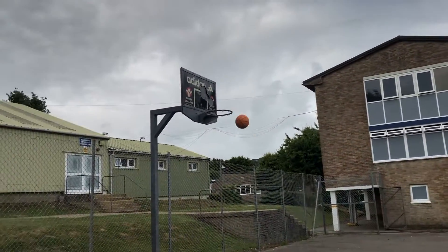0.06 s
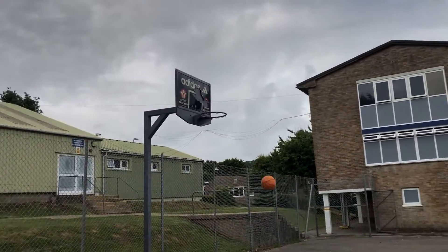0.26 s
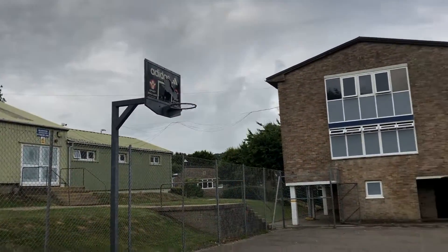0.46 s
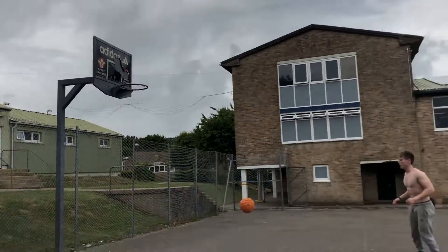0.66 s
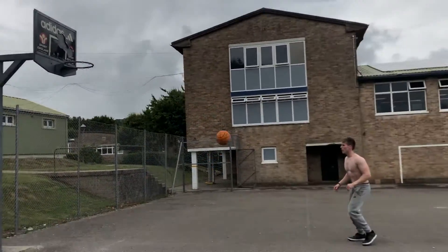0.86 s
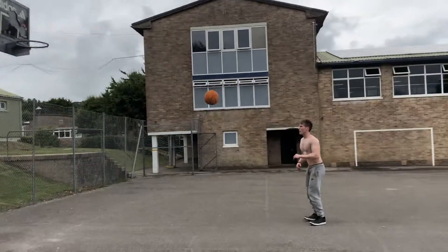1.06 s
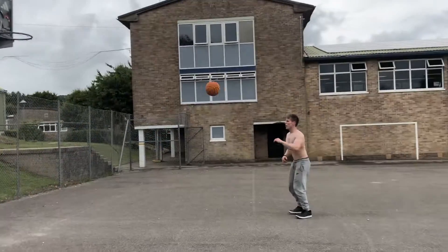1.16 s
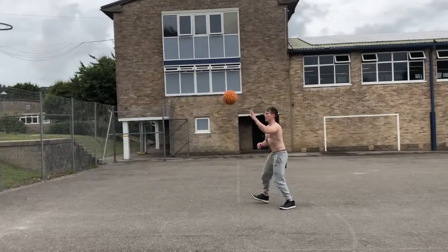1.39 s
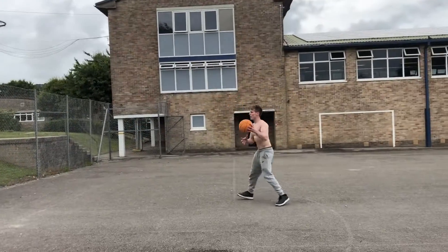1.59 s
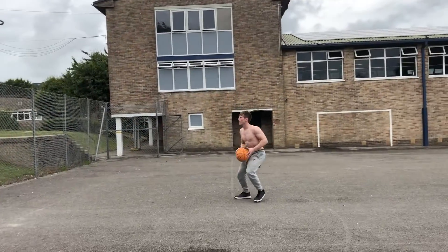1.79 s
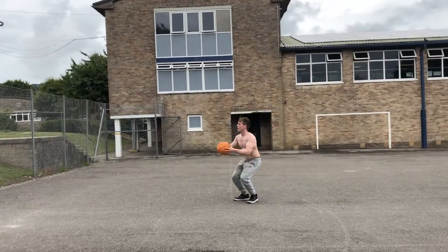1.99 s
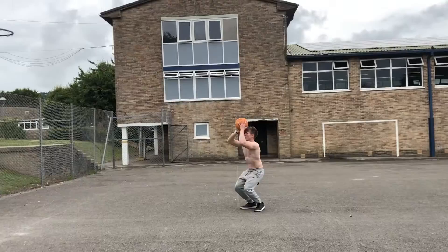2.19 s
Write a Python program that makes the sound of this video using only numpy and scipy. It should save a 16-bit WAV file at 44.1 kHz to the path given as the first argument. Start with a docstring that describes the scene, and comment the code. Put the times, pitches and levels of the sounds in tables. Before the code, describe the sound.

A basketball bounces once on tarmac close by at 0.5 seconds, a sharp, loud bang with a short echo off buildings. From the start, a loose metal hoop rattles faintly, dying away by about 1.2 seconds. From 0.8 seconds, uneven wind rumbles and thumps on the microphone to the end. Shoes scuff quietly around 1.5 seconds, and hands softly catch the ball at 1.7 seconds.

```python
"""Basketball off an outdoor hoop

A yard between buildings, uneven wind rumbling on the microphone. The ball has just left the hoop,
whose loose rim rattles and dies away. It lands on the tarmac close by: the skin cracks, skin and air
ring, and the walls throw the bang back. A player scuffs in over the grit and catches it."""
import sys
import numpy as np
from scipy import signal
from scipy.fft import rfft, irfft
from scipy.io import wavfile
from scipy.ndimage import uniform_filter1d

SR = 44100
rng = np.random.default_rng(int(sys.argv[2]) if len(sys.argv) > 2 else 0)


def store_pcm(level_fs):
    """Save levels as 16-bit WAV."""
    pcm = np.round(np.clip(level_fs, -1, 1) * 32767).astype(np.int16)
    wavfile.write(sys.argv[1], SR, np.atleast_2d(pcm).T)


N = 99048
T = np.arange(N) / SR
BOUNCE_S = 0.5014

# Wind on the microphone. Each row: time in seconds, rumble level in dB, flutter level in dB.
WIND_LEVELS = [(.03, -55, -57), (.09, -58.5, -54.5), (.81, -51.5, -60), (0.844, -38, -55.5),
               (0.941, -38, -46.5), (1.01, -39, -49), (1.138, -39, -37), (1.23, -40.5, -59.5),
               (1.39, -35.5, -42.5), (1.491, -39, -46.5), (1.62, -41.5, -55), (1.861, -50.5, -53.5),
               (2.03, -44, -57.5), (2.169, -45.5, -63.5), (2.223, -33, -42)]
# Low rumble, the flutter above it, and the open-air hush. Each row: frequency in Hz, level in dB.
RUMBLE_SPECTRUM = [(22, -28.5), (36, -6.5), (55, 6), (110, 3.5), (230, -12.5), (400, -62), (4000, -110)]
FLUTTER_SPECTRUM = [(100, -9.5), (180, 0.5), (260, -2.5), (400, -14.5), (900, -40.5), (2000, -73.5),
                    (12000, -76)]
HUSH_SPECTRUM = [(240, -11.5), (400, -1), (801, -9), (2250, -21), (3500, -29), (5870, -24), (7750, -33.5),
                 (15000, -40.5)]
# The hardest buffets. Each row: middle in seconds, level in dB, frequency in Hz.
EDDIES = [(0.917, -31.5, 129), (0.945, -27, 82.5), (1.132, -29, 232), (1.177, -29, 143), (1.26, -28, 117),
          (1.393, -29.5, 112), (1.484, -25.5, 130), (2.218, -29.5, 121)]

# Echoes off the buildings. Each row: delay in seconds, level in dB, scatter level in dB.
WALL_ECHOES = [(.091, -14, -22), (0.146, -28.5, -27.5), (.16, -32, -24)]
# What the walls return, and the yard's reverberation. Each row: frequency in Hz, level in dB.
WALL_SPECTRUM = [(560, 0.5), (780, -0.5), (980, 4), (1350, -10), (1560, 0), (3000, -2.5), (15000, -20.5)]
REVERB_SPECTRUM = [(60, -23), (600, 2.5), (1400, -3), (3500, -1), (6000, -5.5), (14000, -1.5)]

# Ticks of metal and grit, and two soft plops. Each row: start in seconds, level in dB.
TICK_HITS = [(0.232, -46.5), (1.056, -47.5), (1.428, -51.5)]
PLOP_HITS = [(2.113, -45.5), (2.154, -43)]
# Dull knocks. Each row: start in seconds, level in dB, centre in Hz.
KNOCK_HITS = [(0.026, -46.5, 1070), (0.191, -42, 392), (1.701, -46, 568)]
# The colour of a tick. Each row: frequency in Hz, level in dB.
TICK_SPECTRUM = [(1100, 10.5), (2200, -14), (6500, -2), (9000, -24), (15000, -34)]

# Soles sliding over sand. Each row: middle in seconds, level in dB, width in seconds.
SOLE_SLIDES = [(1.509, -67.5, 0.012), (1.712, -64, 0.012), (1.842, -65, .005)]
# Shoes scuffing the tarmac. Each row: start in seconds, level in dB, rise in seconds.
SHOE_SCUFFS = [(1.448, -56, 0.0013), (1.588, -54.5, 0.0019), (1.697, -51.5, 0.0046)]
# Hands meeting the ball. Each row: start in seconds, level in dB, 60 dB decay in seconds.
HAND_SLAPS = [(1.662, -49, 0.015), (1.672, -42, 0.022), (1.703, -44, 0.083), (1.720, -48, 0.1),
              (1.738, -50.5, 0.066), (1.752, -44, 0.04)]
# The colours of sand, shoes and palms. Each row: frequency in Hz, level in dB.
SAND_SPECTRUM = [(5700, 6), (9000, -10.5), (15000, -17.5)]
SHOE_SPECTRUM = [(200, 20.5), (600, 13.5), (2200, 1), (4000, -14), (6000, -4.5), (9000, -23), (15000, -26)]
PALM_SPECTRUM = [(150, 7.5), (550, -11), (950, 0), (1450, 6), (2100, -8.5), (3000, -20.5), (6000, -23.5),
                 (15000, -55)]

# Knocks of the loose rim. Each row: start in seconds, level in dB, rise in seconds.
RIM_KNOCKS = [(.0, -48.5, 0.0013), (0.054, -56, 0.005), (0.113, -51, 0.0035), (0.185, -44.5, 0.0093),
              (0.267, -45.5, 0.022), (0.345, -46.5, 0.0042), (0.417, -47.5, 0.0093), (0.481, -49.5, 0.008),
              (.557, -46.5, 0.0064), (0.638, -50.5, 0.0032), (0.711, -51.5, 0.0094), (0.771, -50, 0.0068),
              (.835, -51, 0.0054), (0.908, -51.5, 0.007), (0.986, -53, 0.0058), (1.124, -53.5, .003),
              (1.182, -53.5, 0.0018)]
# The colour of the rim's chatter. Each row: frequency in Hz, level in dB.
RIM_SPECTRUM = [(150, -14.5), (330, 15), (520, -2.5), (660, 9), (820, -1), (1080, 6.5), (1300, -3),
                (1750, 0), (2150, -11), (2650, -5.5), (4300, -8), (6000, -3.5), (8000, -16.5), (15000, -44)]
# The steel hoop's close modes, each a frequency in Hz.
HOOP_MODES = [1063, 1072, 1112]

# The skin flattening onto grit. Each row: delay in seconds, level in dB, rise and 60 dB decay in seconds.
GRIT_BURSTS = [(0, -20.5, 0.00045, 0.015), (.008, -37.5, 0.00408, 0.062)]
# The first click on the tarmac, and the crushed grit. Each row: frequency in Hz, level in dB.
CRACK_SPECTRUM = [(150, -39.5), (500, -19), (780, 3.7), (1100, 3), (1650, 5), (2100, -17.5), (2600, -8),
                  (3300, -16), (4700, 1.4), (5300, -4.5), (6100, 4), (7000, -13.5), (9500, -17.5),
                  (15000, -49)]
GRIT_SPECTRUM = [(1250, 13), (2300, -4.5), (3500, -5), (4700, -3.5), (6100, 1), (7300, -11), (15000, -30)]
# Modes of the ball's skin and air. Each row: frequency in Hz, level in dB, 60 dB decay in seconds.
BALL_MODES = [(178.4, -27, 0.11), (256.4, -21.5, 0.067), (433, -27, 0.055), (614, -26.5, 0.045),
              (688, -33, 0.067), (903, -24.5, 0.062), (967, -22, 0.053), (1090, -30.5, 0.096),
              (1306, -33, 0.038), (1370, -30.5, 0.096), (1550, -34, 0.043), (1591, -38, 0.089),
              (1656, -32.5, 0.052), (1900, -47.5, 0.021), (2784, -48, 0.0662)]


def amp(db):
    """Decibels to gain."""
    return 10 ** (np.asarray(db) / 20)


def noise(spectrum):
    """Noise of unit rms shaped by (Hz, dB) points, falling away below the first."""
    hz, db = np.array(spectrum, float).T
    f = np.maximum(np.fft.rfftfreq(N, 1 / SR), 1)
    gain = amp(np.interp(np.log(f), np.log(hz), db)) * np.minimum(f / hz[0], 1) ** 2
    x = irfft(gain * np.exp(2j * np.pi * rng.random(len(f))), N)
    return x / x.std()


def click(spectrum, size=2048):
    """Minimum-phase impulse of unit energy shaped by (Hz, dB) points."""
    hz, db = np.array(spectrum, float).T
    f = np.maximum(np.fft.rfftfreq(size, 1 / SR), 1)
    cepstrum = irfft(np.log(amp(np.interp(np.log(f), np.log(hz), db))))
    cepstrum[1:size // 2] *= 2
    cepstrum[size // 2 + 1:] = 0
    x = irfft(np.exp(rfft(cepstrum)))
    return x / np.sqrt(np.sum(x ** 2))


def burst(start, rise, t60):
    """Envelope: a straight rise, then an exponential decay; times in seconds."""
    age = T - start
    attack = np.clip(age / max(rise, 1 / SR), 0, 1)
    return attack * np.exp(-np.log(1000) * np.maximum(age - rise, 0) / t60)


def swell(middle, width):
    """Bell-shaped envelope; times in seconds."""
    return np.exp(-((T - middle) / width) ** 2 / 2)


def glide(hz):
    """A sine that follows a changing frequency."""
    return np.sin(2 * np.pi * np.cumsum(hz) / SR)


def wander(rate_hz):
    """Smooth random drift of unit spread."""
    step = max(int(SR / rate_hz), 1)
    x = uniform_filter1d(np.repeat(rng.standard_normal(N // step + 1), step), step)[:N]
    return x / x.std()


def flicker(depth_db, rate_hz):
    """A gain that wavers at random."""
    return amp(depth_db * wander(rate_hz))


def smear(x, tail):
    """Draw a sound out with a tail of unit energy."""
    return signal.fftconvolve(x, tail / np.sqrt(np.sum(tail ** 2)))[:N]


def wind():
    """Gusts rumble and flutter on the microphone over a faint outdoor hush."""
    times, rumble_db, flutter_db = np.array(WIND_LEVELS).T
    rumble = noise(RUMBLE_SPECTRUM) * amp(np.interp(T, times, rumble_db))
    flutter = noise(FLUTTER_SPECTRUM) * amp(np.interp(T, times, flutter_db))
    gusts = (rumble + flutter) * flicker(depth_db=2, rate_hz=49)
    return gusts + amp(-66) * noise(HUSH_SPECTRUM)


def buffets(width_cycles=0.58):
    """Single eddies thump the microphone for a cycle or two."""
    return sum(amp(db) * swell(t, width_cycles / hz) * np.sin(2 * np.pi * (hz * (T - t) + rng.random()))
               for t, db, hz in EDDIES)


def yard(x):
    """Each building returns a coloured copy and some scatter; a thin reverberation follows."""
    wall = click(WALL_SPECTRUM)
    reflected = signal.fftconvolve(x, wall)[:N] / abs(np.sum(wall))
    out = amp(-20.5) * smear(x, noise(REVERB_SPECTRUM) * burst(0, rise=0.079, t60=1))
    for delay, db, scatter_db in WALL_ECHOES:
        out += amp(db) * np.interp(T - delay, T, reflected, left=0)
        scatter = rng.standard_normal(N) * burst(delay, rise=0.0015, t60=0.13)
        out += amp(scatter_db) * smear(reflected, scatter)
    return out


def ribbed_wall(x, delay_s=0.053, start_hz=2230, end_hz=1490, glide_s=0.037):
    """Ribs further along a wall answer later and wider apart, so the echo is a falling zing."""
    hz = end_hz + (start_hz - end_hz) * np.exp(-np.maximum(T - delay_s, 0) / glide_s)
    zing = glide(hz * (1 + 0.036 * wander(rate_hz=500)))
    return amp(-32) * smear(x, zing * burst(delay_s, rise=0, t60=0.18))


def plops(start_hz=1330, fall_nepers_per_s=150):
    """Two short, soft blips whose pitch drops fast."""
    out = np.zeros(N)
    for t, db in PLOP_HITS:
        hz = start_hz * np.exp(-fall_nepers_per_s * np.maximum(T - t, 0)) * (T > t)
        out += amp(db) * burst(t, rise=0.003, t60=0.035) * glide(hz)
    return out


def ticks_and_knocks():
    """Small bright ticks of metal and grit, and a few dull, soft knocks."""
    out = noise(TICK_SPECTRUM) * sum(amp(db) * burst(t, rise=0.000099, t60=0.018) for t, db in TICK_HITS)
    for t, db, hz in KNOCK_HITS:
        spectrum = [(hz * 0.66, -12), (hz, 0), (hz * 1.3, -15), (hz * 3, -36), (hz * 12, -65)]
        out += amp(db) * burst(t, rise=0.0023, t60=0.072) * noise(spectrum)
    return out


def sand():
    """Sand hisses under sliding soles."""
    slides = sum(amp(db) * swell(t, width) for t, db, width in SOLE_SLIDES)
    return noise(SAND_SPECTRUM) * flicker(depth_db=1.5, rate_hz=730) * slides


def shoes():
    """Shoes scuff the tarmac, rough with many tiny contacts."""
    scuffs = sum(amp(db) * burst(t, rise, t60=0.16) for t, db, rise in SHOE_SCUFFS)
    return noise(SHOE_SPECTRUM) * flicker(depth_db=4.5, rate_hz=830) * scuffs


def catch():
    """Fingers and palms slap the ball in quick succession."""
    slaps = sum(amp(db) * burst(t, rise=0.00033, t60=t60) for t, db, t60 in HAND_SLAPS)
    return noise(PALM_SPECTRUM) * slaps


def rim(treble_hz=7600, treble_start_db=4.5, treble_db_per_s=-8.5):
    """The loose rim chatters in its mount about fourteen times a second and the frame rings on."""
    power = np.zeros(N)
    for t, db, rise in RIM_KNOCKS:
        knock = burst(t, rise, t60=0.091)
        ring = amp(-14) * burst(t, rise, t60=0.53)
        power += amp(db) ** 2 * (knock ** 2 + ring ** 2)
    chatter = np.sqrt(power) * noise(RIM_SPECTRUM) * flicker(depth_db=2.5, rate_hz=700)
    body = signal.sosfiltfilt(signal.butter(4, treble_hz, fs=SR, output="sos"), chatter)
    # The treble dulls as the microphone turns away.
    return body + (chatter - body) * amp(treble_start_db + treble_db_per_s * T)


def hoop():
    """Every knock of the rim sets the steel hoop's close modes ringing."""
    out = np.zeros(N)
    for t, db, rise in RIM_KNOCKS:
        modes = sum(np.sin(2 * np.pi * (hz * T + rng.random())) for hz in HOOP_MODES)
        out += amp(db) * burst(t, rise, t60=0.28) * modes
    return amp(-14.5) * out


def crack(lag_below_hz=3510):
    """First contact: a sharp click whose treble runs ahead through the skin, then crushed grit."""
    snap = np.pad(amp(-0.8) * click(CRACK_SPECTRUM), (int(BOUNCE_S * SR), N))[:N]
    warped = np.tan(np.pi * lag_below_hz / SR)
    allpass = (warped - 1) / (warped + 1)
    for _ in range(8):  # each stage holds the lows back a little more
        snap = signal.lfilter([allpass, 1], [1, allpass], snap)
    crush = sum(amp(db) * burst(BOUNCE_S + delay, rise, t60) for delay, db, rise, t60 in GRIT_BURSTS)
    return snap + noise(GRIT_SPECTRUM) * crush


def bounce(lag_cycles=0.94, rise_cycles=0.58, thump_hz=139.2, sag_nepers_per_s=18.5):
    """Close by, the ball cracks down, its modes enter from high to low, and it squashes with a thump."""
    age = T - BOUNCE_S
    out = crack()
    for hz, db, t60 in BALL_MODES:
        lag = lag_cycles / hz
        envelope = burst(BOUNCE_S + lag, rise_cycles / hz, t60)
        out += amp(db) * envelope * np.sin(2 * np.pi * hz * (age - lag))
    sagging_hz = thump_hz * np.exp(-sag_nepers_per_s * np.maximum(age, 0)) * (age > 0)
    thump = amp(-18.5) * swell(BOUNCE_S + 0.0197, width=0.0072) * glide(sagging_hz)
    return out + thump


def scene():
    """Ball, hoop and player in the yard, heard from one microphone in the wind."""
    ball = bounce()
    player = shoes() + catch()
    echoes = yard(ball + amp(-7.5) * player) + ribbed_wall(ball)
    court = ball + player + echoes + rim() + hoop() + sand() + ticks_and_knocks() + plops()
    return (court + wind() + buffets())[None]


def record(dry, top_hz=15900, fade_s=0.006):
    """The recorder cuts the top of the treble; a brief fade ends the sound without a click."""
    fade = np.sin(np.pi / 2 * np.minimum((T[-1] - T) / fade_s, 1)) ** 2
    lowpass = signal.ellip(8, 0.2, 70, top_hz, fs=SR, output="sos")
    return signal.sosfilt(lowpass, dry * fade)


dry = scene()
out = record(dry)
store_pcm(out)
```